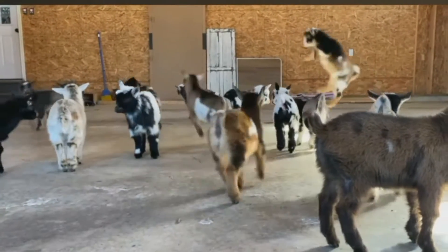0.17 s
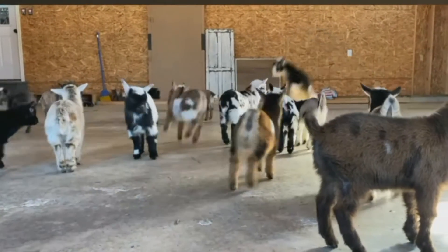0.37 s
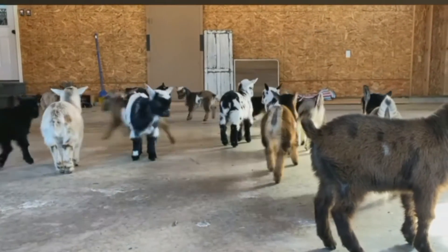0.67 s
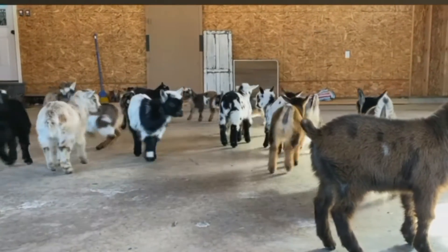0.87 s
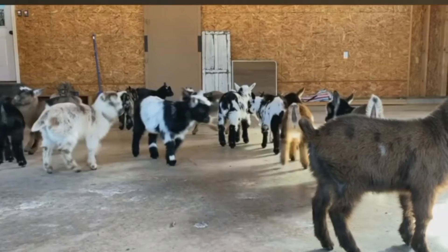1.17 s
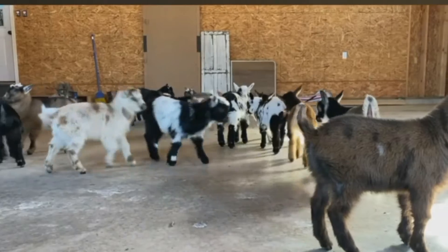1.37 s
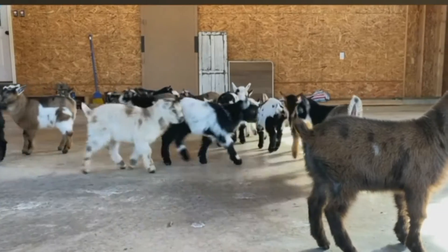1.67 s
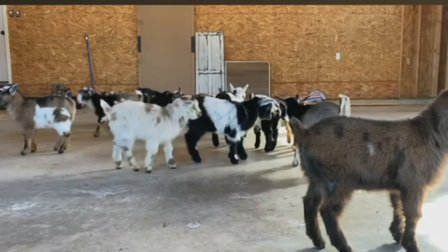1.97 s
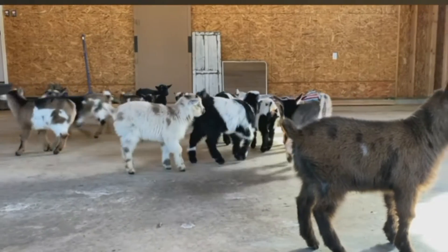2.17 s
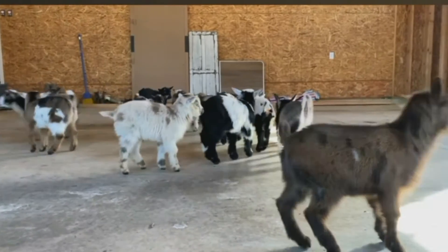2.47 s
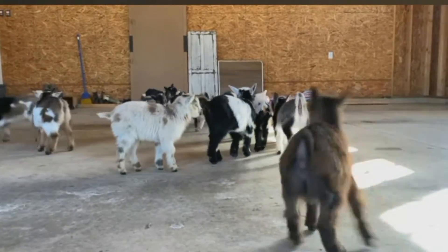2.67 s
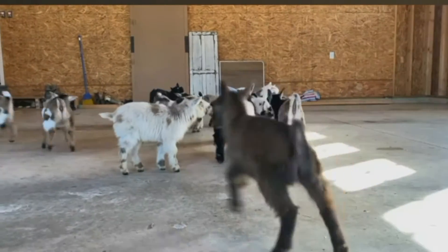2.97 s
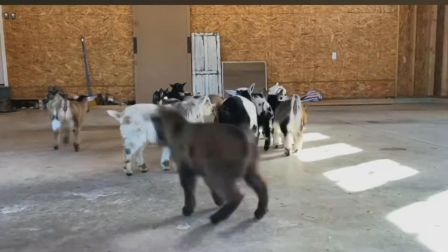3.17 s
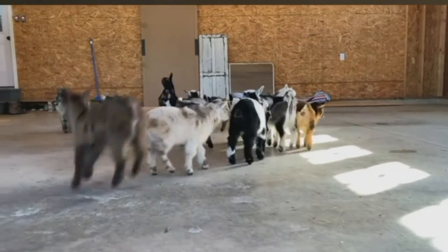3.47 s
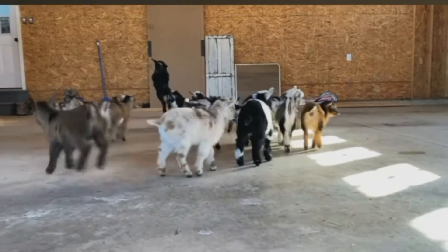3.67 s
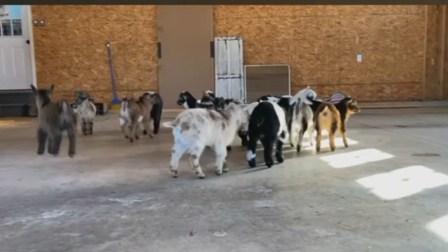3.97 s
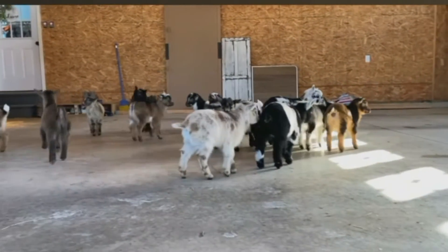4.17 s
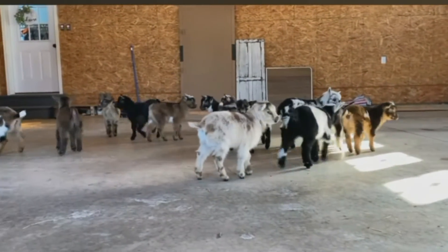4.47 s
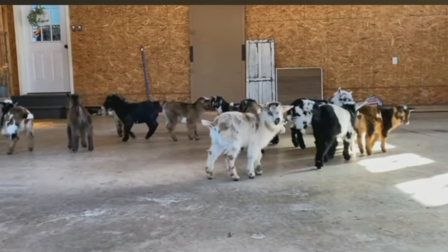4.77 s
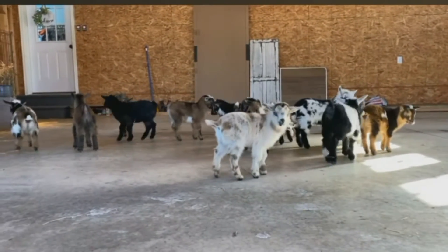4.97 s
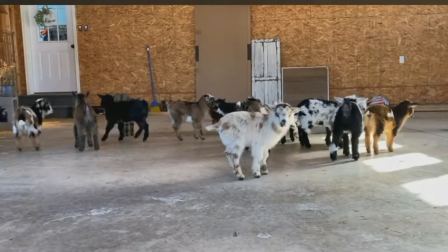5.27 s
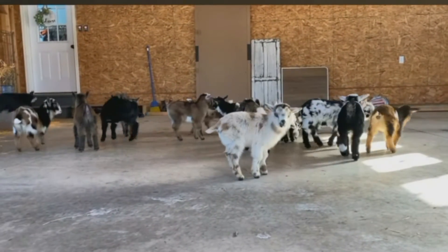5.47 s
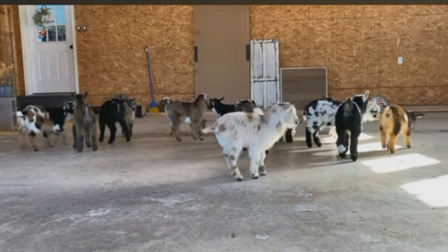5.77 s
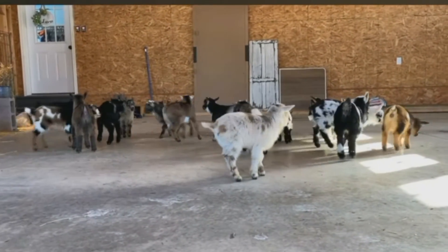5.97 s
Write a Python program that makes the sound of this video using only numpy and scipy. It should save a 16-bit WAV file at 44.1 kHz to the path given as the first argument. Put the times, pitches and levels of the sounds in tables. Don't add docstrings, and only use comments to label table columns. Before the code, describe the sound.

A small herd of young goats moves about in a hard, reverberant shed. Faraway bleats overlap at first, followed by a short quivering call nearby. A quieter stretch holds only low rumble, light scuffs and hoof clicks, building to a hard landing. Then one kid bleats loudly for almost two seconds, fluttering first and steadier later, before small scrapes and taps remain. Simple phone pickup.

```python
import sys
import numpy as np
from scipy import signal
from scipy.fft import rfft, irfft, next_fast_len
from scipy.io import wavfile
from scipy.ndimage import uniform_filter1d, minimum_filter1d, map_coordinates

SR = 44100
rng = np.random.default_rng(int(sys.argv[2]) if len(sys.argv) > 2 else 0)


def rack_gain(trim_db):
    fader = np.asarray(trim_db, float)
    return 10 ** (fader / 20)


def master_out(mix):
    frames = np.transpose(np.atleast_2d(mix))
    ceiling = np.clip(frames, -1, 1)
    pcm = np.round(ceiling * 32767).astype(np.int16)
    wavfile.write(sys.argv[1], SR, pcm)


N = 269451

# f/Hz, level/dB per Hz
RUMBLE_TONE = [(15, -61), (32, -29), (50, 10), (90, 6), (170, -4.5), (300, -27), (500, -23), (2000, -36.5),
               (7000, -59.5), (15500, -52)]
# f/Hz, width/Hz, level/dB
HUM_LINES = [(105, 7.2, -62.5), (225.4, 19, -73)]
# t/s, level/dB
RESTLESSNESS = [(0, -52), (.3, -56), (0.601, -55.5), (1.1, -58.5), (1.65, -67.5), (2.05, -71), (2.35, -64),
                (2.55, -63.5), (2.78, -68), (3.1, -73), (3.22, -58.5), (3.42, -69.5), (3.8, -57.5),
                (4.4, -61.5), (5.0, -69), (5.45, -67.5), (5.78, -68.5), (6.11, -62)]
# t/s, low patter level/dB, mid shuffle level/dB
LANDINGS = [(.13, -56, -51.5), (0.489, -52, -55), (.55, -50.5, -55), (1.22, -52.5, -68),
            (2.578, -53.5, -67), (2.714, -61.5, -71), (2.931, -58.5, -75), (3.161, -46.5, -65),
            (3.482, -56, -60), (3.62, -50, -55.5), (4.04, -51, -59), (4.51, -60, -80), (4.679, -65.5, -86),
            (4.79, -58.5, -69), (5.27, -70, -58), (5.63, -79, -65.5), (5.88, -58.5, -66)]
# f/Hz, level/dB per Hz
PATTER_TONE = [(50, -5), (100, 0.5), (230, 2.5), (400, -9), (800, -18), (1600, -35.5)]
# f/Hz, level/dB per Hz
SHUFFLE_TONE = [(300, -9), (600, -2), (1200, -5.5), (2000, -1.5), (3500, -20.5), (6000, -27.5)]
# f/Hz, level/dB per Hz
RUSTLE_TONE = [(800, -23), (2000, 2), (4000, -4.5), (7000, -1.5), (8500, -10.5), (11000, -35.5)]
# t/s, length/s, level/dB
SCUFFS = [(0.258, 0.073, -63.5), (.538, .002, -66), (1.457, 0.026, -76.5), (1.744, 0.0068, -87),
          (2.008, .01, -77), (2.324, 0.094, -87), (2.55, 0.04, -66), (2.763, 0.0023, -72.5),
          (2.861, 0.0018, -79), (3.003, 0.012, -65), (3.021, 0.029, -57.5), (3.152, 0.055, -72),
          (3.245, .002, -64.5), (3.447, .01, -79.5), (5.279, .06, -63.5), (5.434, 0.023, -59.5),
          (5.48, 0.12, -68), (5.708, 0.023, -71), (5.815, 0.085, -66), (5.894, 0.16, -73.5),
          (6.08, 0.033, -67.5)]
# f/Hz, level/dB per Hz
SCUFF_TONE = [(500, -24.5), (1600, -15), (4300, -5.5), (7800, -8.5), (10800, -5), (15500, -7.5)]
# t/s, click level/dB, click f/Hz, click t60/s, thud level/dB
TAPS = [(.128, -43.5, 620, 0.11, -50), (0.47, -38, 920, 0.0032, -47), (0.535, -35.5, 3740, 0.0046, -60),
        (1.754, -42.5, 2796, 0.0021, -84), (2.25, -66, 2100, 0.026, -66.5),
        (2.707, -35, 2380, 0.00097, -54), (2.865, -70.5, 1490, 0.0022, -56),
        (2.926, -45.5, 1480, 0.0057, -43.5), (3.141, -37.5, 11040, 0.0037, -52),
        (3.1437, -27.5, 4120, 0.0031, -47), (3.157, -38.5, 1370, 0.011, -41),
        (3.167, -47, 7400, 0.0083, -58), (3.34, -69, 3950, 0.0084, -54), (3.624, -41, 1010, 0.011, -66),
        (4.046, -41, 1060, 0.0063, -46), (4.07, -40, 910, 0.0066, -48.5), (5.824, -44.5, 3600, 0.0044, -78),
        (5.88, -50.5, 3500, 0.0063, -51)]
# t/s, settled pitch f/Hz, level/dB
FAR_CALL = [
    (0, 721, -52),
    (.06, 772, -48),
    (.16, 747, -49),
    (.26, 729, -54),
    (.365, 759.7, -47.5),
    (.46, 730, -67.5),
    (.58, 701, -56),
    (.63, 703, -58.5),
]
# t/s, settled pitch f/Hz, level/dB
OTHER_CALL = [
    (.05, 838, -40.5),
    (.09, 792, -57.5),
]
# t/s, settled pitch f/Hz, level/dB
SHORT_CALL = [
    (.698, 831.5, -33),
    (.8, 846, -31.5),
    (.88, 846, -38),
    (.96, 817.3, -36.5),
    (1.09, 808.6, -43),
    (1.19, 800, -44.5),
    (1.27, 790, -66.5),
]
# t/s, settled pitch f/Hz, level/dB
LONG_CALL = [
    (3.502, 843.3, -38),
    (3.58, 864, -32),
    (4.1, 858, -33),
    (4.36, 819.4, -32.5),
    (4.47, 863.4, -34),
    (4.62, 848.5, -33.5),
    (4.86, 887.2, -32),
    (5.08, 866, -28.5),
    (5.205, 815.7, -32),
]
# t/s, pitch lift f/Hz, dip before it level/dB
FAR_QUIVER = [
    (0.028, 18.5, 5.5),
    (0.121, 16, 13),
    (0.233, 21.3, 9.3),
    (0.336, 16.3, 10),
    (0.431, 15, 11),
    (0.55, 22, 12),
]
# t/s, pitch lift f/Hz, dip before it level/dB
SHORT_QUIVER = [
    (0.764, 80, 23.5),
    (0.854, 89.2, 14),
    (0.954, 78.5, 9.5),
    (1.06, 44.3, 16),
    (1.161, 29.2, 15.5),
]
# t/s, pitch lift f/Hz, dip before it level/dB
LONG_QUIVER = [(3.485, 32, 4), (3.56, 59, 14), (3.649, 62, 12.5), (3.74, 65, 14), (3.83, 51, 15.5),
               (3.913, 58, 11), (4, 56, 11.5), (4.091, 75, 14.2), (4.179, 40.7, 6.5), (4.26, 46, 4),
               (4.347, 81, 18), (4.446, 8.6, 9), (4.6, 4, -0.5), (4.903, 28, 1.5), (4.998, 3.7, 3),
               (5.165, 5.1, 12)]
# t/s, length/s, half-pitch share level/dB
CRACKS = [
    (.88, 0.39, -40.5),
    (4.723, 0.1, -32.5),
    (5.075, 0.067, -41.5),
]
# f/Hz, level/dB
THROAT = [(400, -46), (870, -18), (1730, -1.5), (2600, -8), (3450, -5.5), (4300, 4.5), (5200, -4),
          (6100, 0), (7000, -5), (7900, -6), (9500, -10), (10500, -12), (14000, -3.5), (15600, -63)]
# f/Hz, level/dB per Hz
BREATH_TONE = [(600, -52), (1500, -36), (4000, -28), (5400, -6), (7500, 0), (10000, 2.5), (13000, 3),
               (15500, -8)]
# f/Hz, level/dB per Hz
GASP_TONE = [(1500, -27.5), (3200, -24.5), (4300, -6.5), (8000, -6.5), (11000, -7), (15500, -17)]
# f/Hz, level/dB
TURNED_HEAD = [(1500, 1.5), (4000, -1.5), (6000, 2.5), (8000, -6), (10000, -8.5), (14000, -7)]
# f/Hz, level/dB
DISTANCE = [(1500, -1.5), (6000, -2), (9000, 2.5), (12000, -18)]
# f/Hz, t60/s
SHED_DECAY = [(200, 1), (1500, 0.8), (4000, 0.64), (8000, 0.48), (14000, 0.073)]
# f/Hz, level/dB
TREBLE_GAP = [(8000, 0), (8400, -8), (8700, -33), (9250, -36), (9500, -3), (9800, 0)]

TOP_HZ = 15720
DULL_S = 0.28
# at the start, DULL_S before the end, at the end
FAR_BRIGHT, SHORT_BRIGHT, LONG_BRIGHT = (-1.1, -0.41, -1.6), (1.6, -0.6, -2.5), (1.1, 0.65, -1.3)
LEAD_IN_S, LEAD_OUT_S = 0.05, 0.08
ATTACK_DB_PER_S, RELEASE_DB_PER_S, RELEASE_SAG_HZ_PER_S = 901.5, 610.5, 390
ONSET_HUSH_DB_PER_S = 300
HALF_PITCH_DB, BREAK_S = (-61, -53.5, -2), 0.04
FRAY, FRAY_S = 4, 0.05
GASP_LEAD_S, GASP_S, GASP_DB = 0.027, (0.021, 0.03), (-17.5, -22)


def unit(x):
    return x / np.sqrt(np.mean(x ** 2) + 1e-20)


def along(points, hz):
    f, value = np.transpose(points)
    return np.interp(np.log(hz + 1), np.log(f + 1), value)


def wobble(rate, size=N):
    knots = rng.standard_normal(int(size * rate / SR) + 4)
    return map_coordinates(knots, [np.arange(size) * rate / SR])


def filtered(x, response):
    m = next_fast_len(N + 8192)
    return irfft(rfft(x, m) * response(np.fft.rfftfreq(m, 1 / SR)), m)[..., :N]


def equalised(x, curve):
    return filtered(x, lambda hz: rack_gain(along(curve, hz)))


def noise(tone):
    return unit(equalised(rng.standard_normal(N), tone))


def played(db, tone, lumps_db, rate):
    return rack_gain(db) * unit(rack_gain(lumps_db * wobble(rate)) * noise(tone))


def bursts(starts, lengths, peaks_db, rise, fall):
    t = np.arange(0, N / SR, 1 / 1000)[:, None]
    before = np.clip(starts - t, 0, None)
    after = np.clip(t - starts - lengths, 0, None)
    db = peaks_db - rise * before - fall * after
    return np.interp(np.arange(N) / SR, t[:, 0], db.max(axis=1))


def hum_line(centre, width):
    return unit(filtered(rng.standard_normal(N), lambda hz: 1 / (1 + ((hz - centre) / width * 2) ** 2)))


def machine():
    hum = sum(rack_gain(db) * hum_line(centre, width) for centre, width, db in HUM_LINES)
    return rack_gain(-61.0) * noise(RUMBLE_TONE) + hum


def herd():
    busy_db = np.interp(np.arange(N) / SR, *np.transpose(RESTLESSNESS))
    s, low_db, mid_db = np.transpose(LANDINGS)
    patter_db = np.maximum(busy_db, bursts(s, 0, low_db, rise=1200, fall=128))
    shuffle_db = np.maximum(-75.5 + 1.2 * (busy_db + 65), bursts(s, 0, mid_db, rise=1200, fall=128))
    rustle_db = -76.5 + 1.88 * (busy_db + 63.5)
    patter = played(patter_db, PATTER_TONE, lumps_db=3.5, rate=36)
    shuffle = played(shuffle_db, SHUFFLE_TONE, lumps_db=2.5, rate=66)
    return patter + shuffle + played(rustle_db, RUSTLE_TONE, lumps_db=0.5, rate=25)


def scuffs():
    db = bursts(*np.transpose(SCUFFS), rise=807.5, fall=233)
    return played(np.maximum(db, -96.5), SCUFF_TONE, lumps_db=2.2, rate=35)


def hooves():
    out, t = np.zeros(N + SR), np.arange(SR // 8) / SR
    for s, db, hz, t60, thud_db in TAPS:
        grit = rack_gain(-60 * t / 0.005) * rng.standard_normal(len(t)) * (hz / 6000) ** 2
        ring = rack_gain(-60 * t / t60) * (1 - np.exp(-t * hz * 3)) * np.sin(2 * np.pi * hz * t)
        click = 1.16 * ring + 0.37 * grit
        slab = np.sin(2 * np.pi * 200 * t) + 2.9 * np.sin(2 * np.pi * 95 * t)
        thud = rack_gain(-60 * t / 0.036) * (1 - np.exp(-t / 0.0036)) * slab
        out[round(s * SR):][:len(t)] += rack_gain(db) * click + rack_gain(thud_db + 3) * thud
    return out[:N]


def squeezed(t, pitch, db, quiver, settle):
    for at, lift_hz, dip_db in quiver:
        after = np.clip(t - at, 0, None)
        pitch = pitch + lift_hz * np.exp(-after / settle) * np.clip((t - at) / 0.014 + 1, 0, 1)
        dip_s = np.where(t < at - 0.006, 0.03, 0.02)
        db = db - dip_db * np.exp(-((t - at + 0.012) / dip_s) ** 2)
    return pitch, db


def voiced(t, pitch, turn, tilt, half_db):
    k = np.arange(1, 41)[:, None] / 2
    level = along(THROAT, k * pitch) + tilt * np.log2(k * pitch / 4000) + (k % 1 > 0) * half_db
    knots = np.arange(t[0], t[-1] + 0.06, 0.03)
    flicker = rng.standard_normal((len(k), len(knots)))
    level += 5.5 * np.array([np.interp(t, knots, row) for row in flicker])
    return unit(np.sum(rack_gain(level) * (k * pitch < TOP_HZ) * np.sin(k * turn + k ** 2), 0))


def bleat(rows, quiver, bright, jitter, breath_db, settle):
    s, held_hz, held_db = np.transpose(rows)
    first = max(int((s[0] - LEAD_IN_S) * SR), 0)
    t = np.arange(first, int((s[-1] + LEAD_OUT_S) * SR)) / SR
    early, late = np.clip(s[0] - t, 0, None), np.clip(t - s[-1], 0, None)
    pitch = np.interp(t, s, held_hz) - RELEASE_SAG_HZ_PER_S * late
    db = np.interp(t, s, held_db) - ATTACK_DB_PER_S * early - RELEASE_DB_PER_S * late
    tilt = np.interp(t, [s[0], max(s[0], s[-1] - DULL_S), s[-1]], bright)
    half_db = np.interp(t, [s[0], s[-1], s[-1] + BREAK_S], HALF_PITCH_DB)
    cracks_db = bursts(*np.transpose(CRACKS), rise=400, fall=400)
    half_db = np.maximum(half_db, cracks_db[first:first + len(t)])
    pitch, db = squeezed(t, pitch, db, quiver, settle)
    slack = np.clip(rack_gain(0.73 * (db.max() - db)), 1, 8)
    fray = np.interp(t, [s[-1] - FRAY_S, s[-1]], [1, FRAY])
    pitch = pitch * (1 + jitter * np.maximum(slack, fray) * wobble(150, size=len(t)))
    turn = 2 * np.pi * np.cumsum(pitch) / SR
    tone = rack_gain(-ONSET_HUSH_DB_PER_S * early) * voiced(t, pitch, turn, tilt, half_db)
    air = rack_gain(breath_db) * slack * noise(BREATH_TONE)[:len(t)] * (1 + np.cos(turn))
    out = np.zeros(N)
    out[first:first + len(t)] = rack_gain(db) * (tone + air)
    gasp_db = bursts(s[[0, -1]] - GASP_LEAD_S, GASP_S, held_db[[0, -1]] + GASP_DB, rise=900, fall=450)
    return out + rack_gain(gasp_db) * noise(GASP_TONE)


def far_kids():
    call = bleat(FAR_CALL, FAR_QUIVER, FAR_BRIGHT, jitter=0.008, breath_db=-22, settle=0.02)
    other = bleat(OTHER_CALL, [], FAR_BRIGHT, jitter=0.005, breath_db=-18, settle=0.02)
    return equalised(call + other, DISTANCE)


def near_kid():
    short = bleat(SHORT_CALL, SHORT_QUIVER, SHORT_BRIGHT, jitter=0.0024, breath_db=-23, settle=0.014)
    long = bleat(LONG_CALL, LONG_QUIVER, LONG_BRIGHT, jitter=0.003, breath_db=-27, settle=0.022)
    return equalised(short, TURNED_HEAD) + long


def shed(x, gap):
    hz, t, z = signal.stft(rng.standard_normal(SR), SR, nperseg=256)
    tail = signal.istft(z * rack_gain(-60 * t / along(SHED_DECAY, hz)[:, None]), SR, nperseg=256)[1]
    return signal.fftconvolve(np.pad(x, (int(gap * SR), 0)), tail / np.linalg.norm(tail))[:N]


def stirred(x):
    return map_coordinates(x, [np.arange(N) + 0.00014 * SR * wobble(30)], order=1, mode="nearest")


def scene():
    background = machine() + herd() + scuffs()
    taps = hooves()
    steps = taps + rack_gain(-12.0) * shed(taps, gap=0.004)
    far, near = far_kids(), near_kid()
    far_mix = rack_gain(3.5) * far + rack_gain(0.5) * stirred(shed(far, gap=0.003))
    near_mix = rack_gain(3) * (near + rack_gain(-3.5) * stirred(shed(near, gap=0.008)))
    mid = background + steps + far_mix + near_mix
    return np.array([mid, mid])


def masked(x, depth_db):
    z = signal.stft(x, nperseg=1024, noverlap=768)[2]
    band = uniform_filter1d(uniform_filter1d(np.abs(z) ** 2, size=5, axis=0), size=6, axis=1)
    loudest = -minimum_filter1d(-band, size=41, axis=0)
    lows = np.arange(len(z))[:, None] < 37
    heard = (band > rack_gain(2 * depth_db) * loudest) | lows
    return signal.istft(z * heard, nperseg=1024, noverlap=768)[1][:N]


def treble_copy(x, share, side_db):
    z = signal.stft(x, nperseg=256, noverlap=192)[2]
    power = uniform_filter1d(uniform_filter1d(np.abs(z) ** 2, size=13, axis=0), size=20, axis=1)
    outline = np.sqrt(np.abs(power) + 1e-18)
    top, source = slice(55, 92), slice(19, 56)
    hiss = signal.stft(rng.standard_normal((2, N)), nperseg=256, noverlap=192)[2][:, top]
    hiss = outline[top] * hiss / np.std(hiss)
    copy = z[source] / outline[source] * outline[top]
    mid, side = z.copy(), np.zeros_like(z)
    mid[top] = np.sqrt(share) * copy + np.sqrt(1 - share) * hiss[0]
    side[top] = rack_gain(side_db) * hiss[1]
    return signal.istft(np.array([mid + side, mid - side]), nperseg=256, noverlap=192)[1][:, :N]


def top_cut(x):
    return signal.sosfilt(signal.butter(12, 15690, fs=SR, output="sos"), x)


def record(dry):
    rebuilt = treble_copy(masked(dry[0], depth_db=-27.5), share=0.78, side_db=-14.0)
    mix = filtered(rebuilt, lambda hz: rack_gain(along(TREBLE_GAP, hz)) * (hz < TOP_HZ))
    return top_cut(mix)


dry = scene()
out = record(dry)
master_out(out)
```